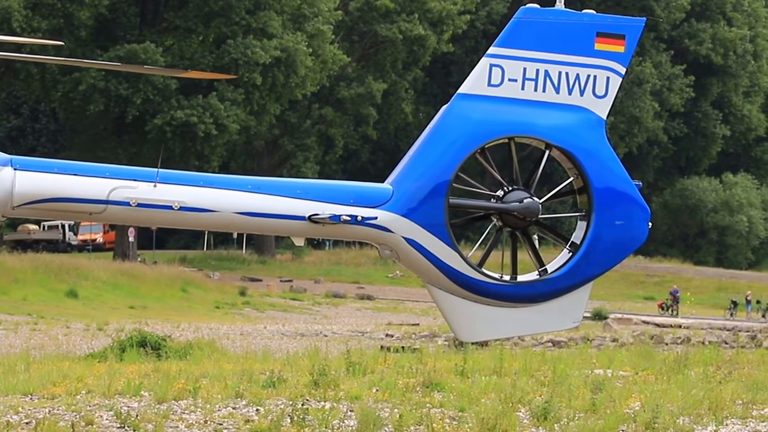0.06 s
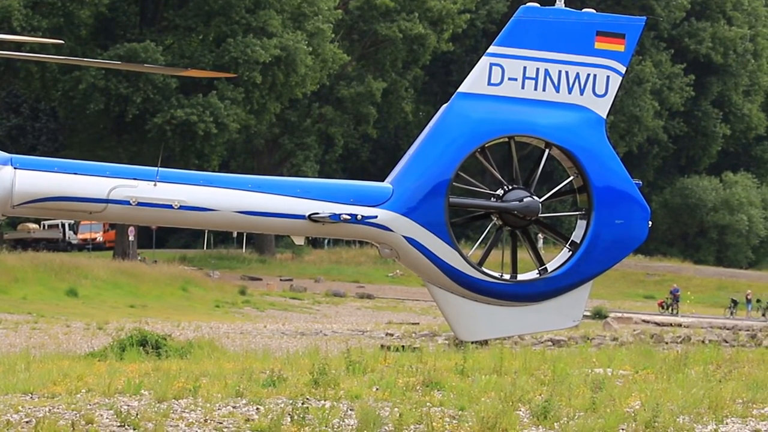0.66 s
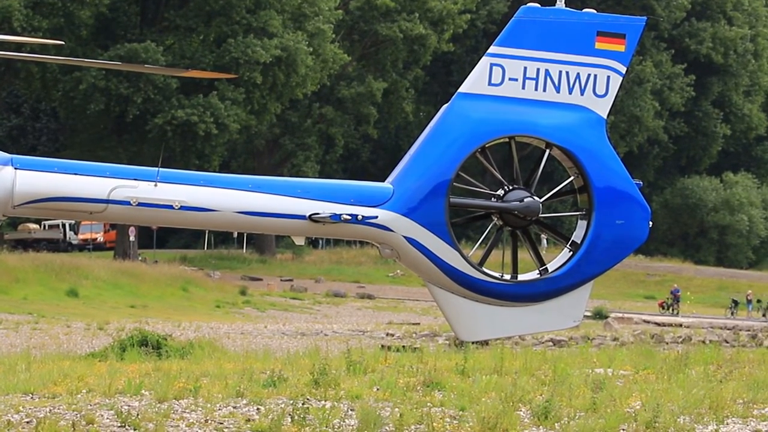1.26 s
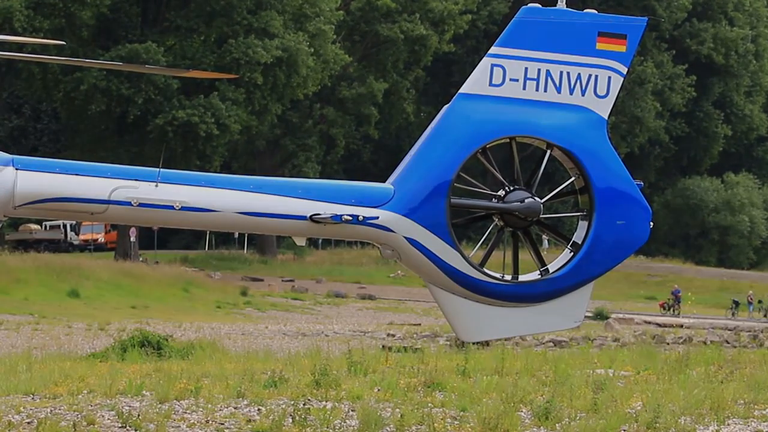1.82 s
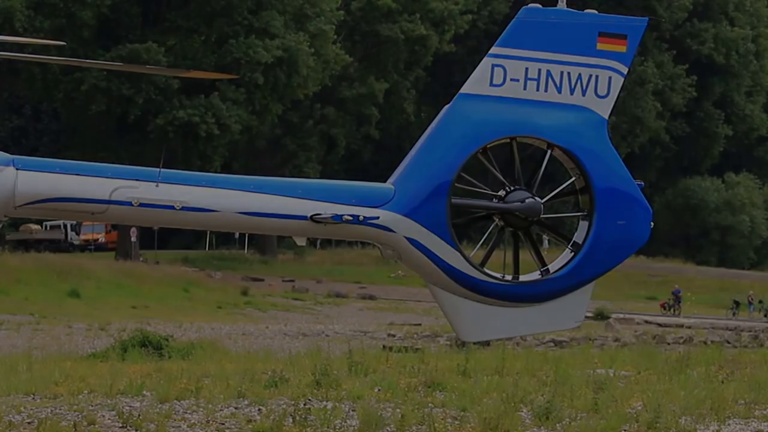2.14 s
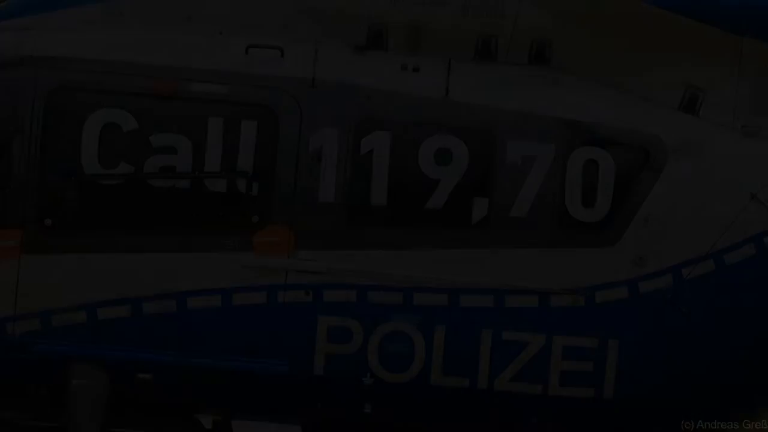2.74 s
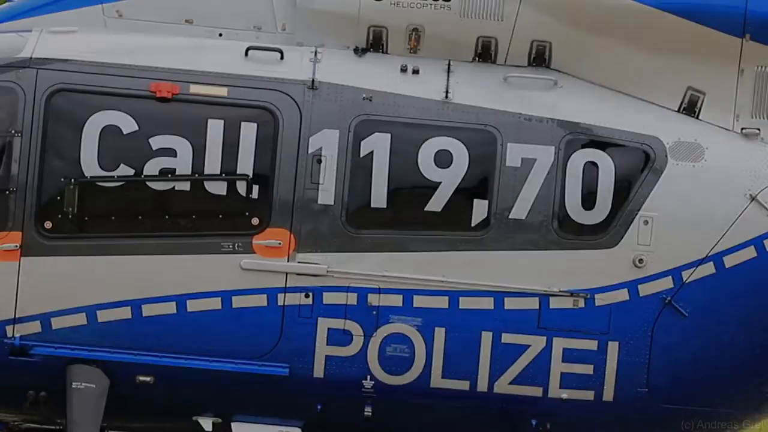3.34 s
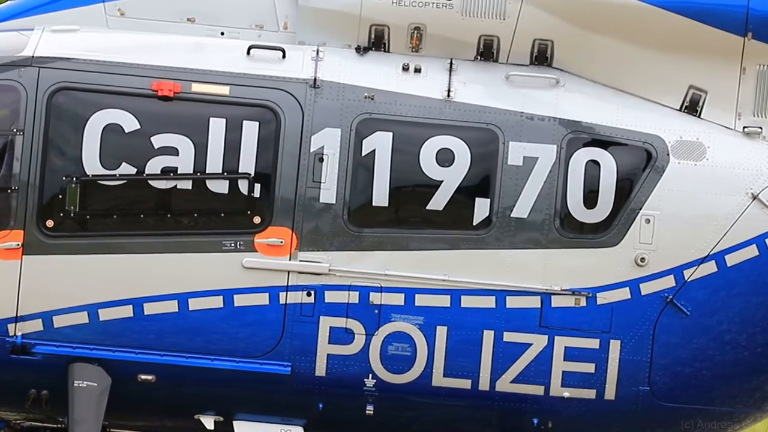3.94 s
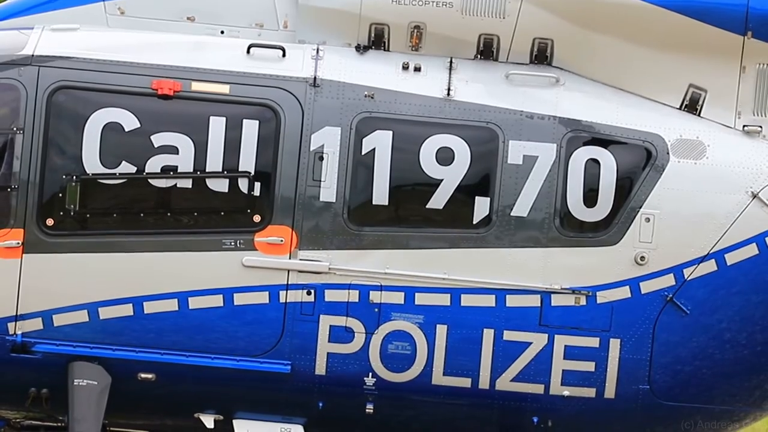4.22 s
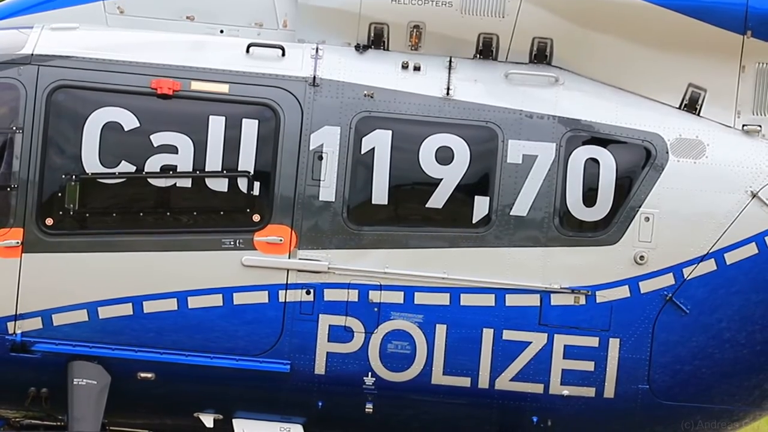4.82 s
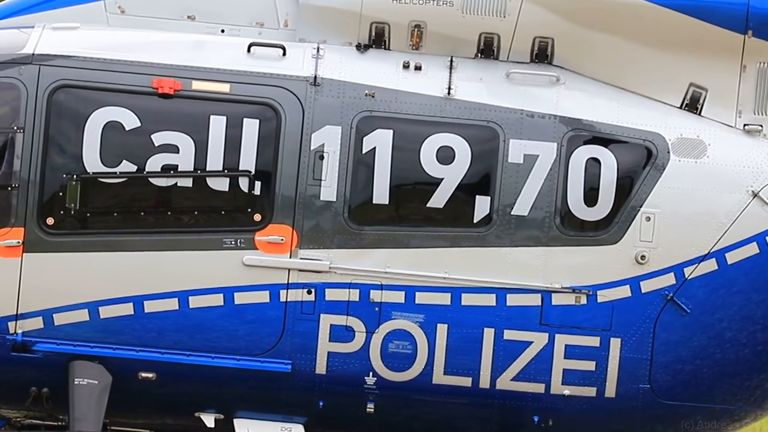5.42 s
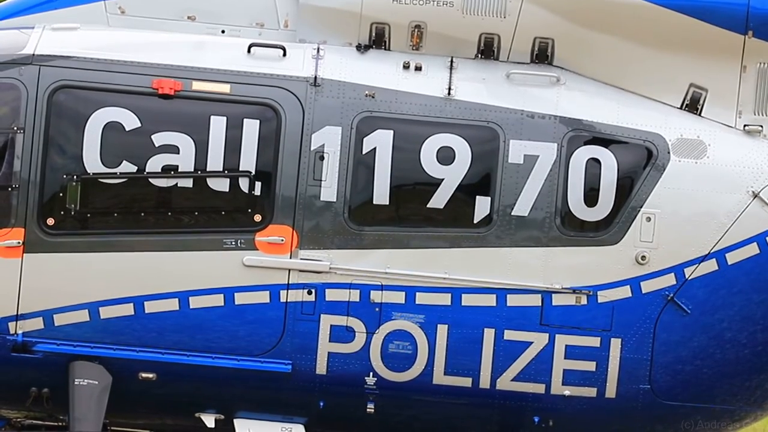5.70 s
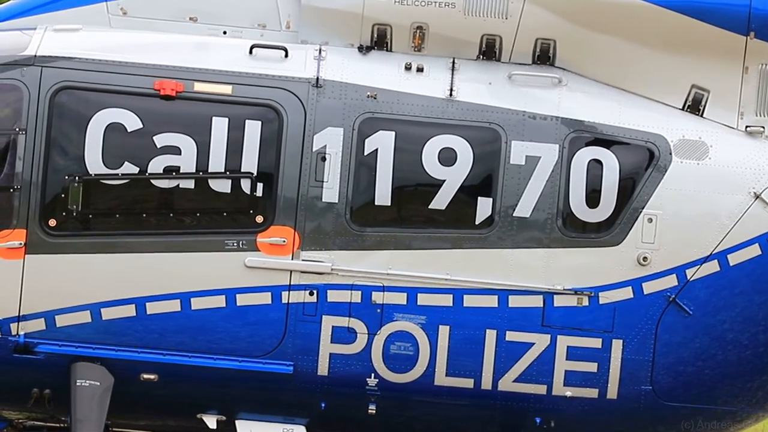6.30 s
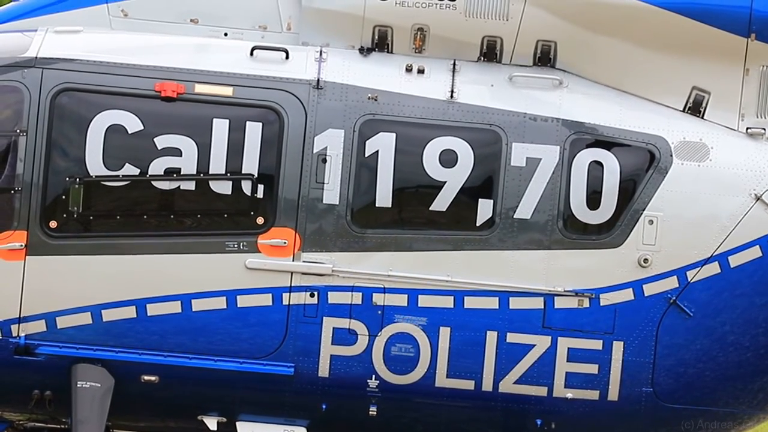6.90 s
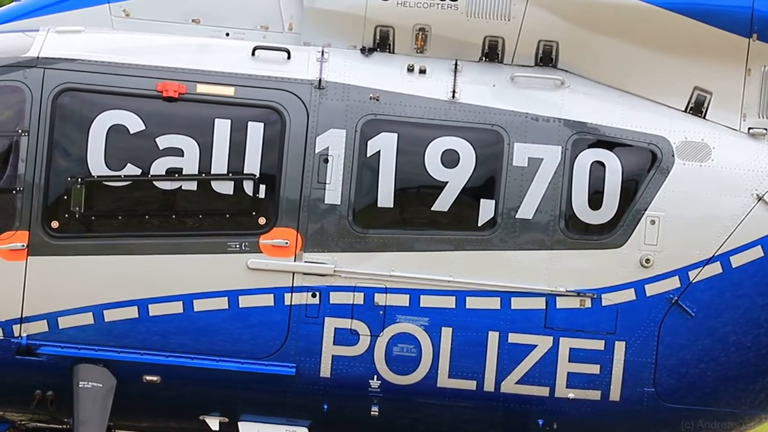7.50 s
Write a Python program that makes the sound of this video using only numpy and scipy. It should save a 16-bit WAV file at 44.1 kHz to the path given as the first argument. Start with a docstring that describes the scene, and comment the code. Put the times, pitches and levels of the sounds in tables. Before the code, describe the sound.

Several diesel machines drone and rattle in the open, their pitch sagging and climbing, with a brief fade to silence.

```python
"""Out in the open, near a parked helicopter, three diesel machines are at work.
A near engine speeds up and sags under load, a farther one drones against it, and a third revs up
late. Their firings make the exhausts hum and the machinery throb and clatter. Dry bearings squeak
and loose metal clinks faintly. The sound fades out at one listening spot and comes back in from
a second, closer to the clatter."""
import sys
import numpy as np
from scipy.fft import rfft, irfft, next_fast_len
from scipy.io import wavfile
from scipy.ndimage import uniform_filter1d, map_coordinates

SR = 44100
rng = np.random.default_rng(int(sys.argv[2]) if len(sys.argv) > 2 else 0)


def pcm_store(signal):
    """Save signal as 16-bit PCM."""
    levels = np.round(np.clip(np.atleast_2d(signal), -1, 1) * 32767)
    wavfile.write(sys.argv[1], SR, levels.astype(np.int16).T)


N = 337806
TIME = np.arange(N) / SR
SILENT_AT_S = 2.673  # the silent moment between the two spots


def amp(db):
    """Turn decibels into a gain."""
    return 10 ** (np.asarray(db) / 20)

def unit(x):
    """Scale x to an average power of 1."""
    return x / np.sqrt(np.mean(x ** 2) + 1e-20)

def curve(rows):
    """Join (seconds, value) points into one value per sample."""
    return np.interp(TIME, *np.transpose(rows))

def wobble(rate):
    """A smooth random curve through rate points a second."""
    return map_coordinates(rng.standard_normal(int(N * rate / SR) + 4), [TIME * rate])

def filtered(x, response):
    """Scale each frequency in x by response(hz)."""
    size = next_fast_len(N + SR // 2)
    return irfft(rfft(x, size) * response(np.fft.rfftfreq(size, 1 / SR)), size)[:N]

def rush(spectrum, pulse=1):
    """Noise of power 1, pulsed and then shaped by (Hz, relative dB) points."""
    freqs, db = np.transpose(spectrum)
    colour = lambda hz: amp(np.interp(np.log(hz + 1), np.log(freqs), db, left=-120, right=-120))
    return unit(filtered(pulse * rng.standard_normal(N), colour))

def blurred_tone(centre_hz, width_hz):
    """Noise of power 1, so narrow that it has a pitch."""
    return unit(filtered(rng.standard_normal(N), lambda hz: 1 / (1 + ((hz - centre_hz) / width_hz) ** 2)))

def turns(hz):
    """Count the cycles completed at a changing rate."""
    return np.cumsum(hz) / SR

def bursts(cycle, sharpness, scatter_db):
    """One swell per cycle, each of its own size."""
    size = amp(scatter_db * rng.standard_normal(4096))[np.floor(cycle).astype(int) % 4096]
    return unit(size * np.exp(-sharpness * (1 + np.cos(2 * np.pi * cycle))))

def by_spot(first, second):
    """One value before the silence, another after it."""
    return np.where(TIME < SILENT_AT_S, first, second)

def run_up(length_s=1.0):
    """How far the third engine has come in, from 0 to 1."""
    return np.clip((TIME - REVVING_SPEED[0][0]) / length_s, 0, 1)

def pull(hz, smooth_s=0.16):
    """How fast an engine speeds up, in Hz per second."""
    return uniform_filter1d(np.maximum(np.gradient(hz) * SR, 0), int(smooth_s * SR))

# Surges of work. Each row: start in seconds, hold in seconds, boost in dB that each noise scales.
WORK_SURGES = [(3.204, 0.24, 3.5), (4.201, 0.18, 5.5), (7.17, 0.16, 5.5), (7.454, 0.13, 3.5)]
def surges(rise_s=.05, fall_s=.089):
    """Extra dB as hard work makes the machinery growl and rattle."""
    return sum(db * np.interp(TIME - start, np.cumsum([0, rise_s, hold, fall_s]), [0, 1, 1, 0])
               for start, hold, db in WORK_SURGES)

def effort(speed_db, pull_db, surge_share, cruise_hz=66.6):
    """Extra dB from work: speed_db per Hz over cruise, pull_db per Hz/s of pull, plus surges."""
    far_hz, near_hz = curve(FAR_SPEED), curve(NEAR_SPEED)
    far_db = speed_db * (far_hz - cruise_hz)
    near_db = speed_db * (near_hz - cruise_hz) + pull_db * pull(near_hz)
    return by_spot(far_db, near_db) + surge_share * surges()


# Thin, steady whistles. Each row: pitch in Hz, level in dB.
WHISTLE_TONES = [(6000, -88), (8000, -91), (10000, -91), (15632, -83)]
def electronics():
    """Electronics add a faint hiss and thin tones."""
    hiss = amp(-67) * rush([(1000, 2), (5000, 2), (7000, 0.17), (15000, -1.6), (17000, -2)])
    return hiss + np.sqrt(2) * sum(amp(db) * np.sin(2 * np.pi * hz * TIME) for hz, db in WHISTLE_TONES)

def sizzle(firings):
    """A thin, bright rattle shakes with the firings and wakes in the surges."""
    shake = bursts(firings, sharpness=0.71, scatter_db=3.5)
    return amp(-82 + 2 * surges()) * rush([(3700, -20), (4100, 0), (4500, -2.5), (5200, -19.5)], shake)

def howl():
    """At the second spot the intake rings out in the surges."""
    return amp(-67 + 3 * surges()) * blurred_tone(centre_hz=780, width_hz=34) * by_spot(0, 1)

# The far engine's gear whine. Each row: pitch in Hz, level in dB.
GEAR_TONES = [(392, -56), (664, -55.3), (753, -52), (1044, -58.5), (1254, -58), (1410, -59)]
def gears():
    """Unevenly meshing teeth make blurred tones, heard only at the first spot."""
    return sum(amp(db) * blurred_tone(hz, width_hz=14) for hz, db in GEAR_TONES) * by_spot(1, 0)

# Squeaks. Each row: start in seconds, length in seconds, first and last pitch in Hz, level in dB.
BEARING_SQUEAKS = [(.19, .12, 2050, 2290, -48), (.30, .14, 1760, 1720, -54), (.37, .11, 1930, 2000, -55),
                   (.58, .16, 2420, 2400, -52), (1.81, .18, 2030, 2410, -50), (5.73, .035, 3880, 3950, -61),
                   (7.04, .26, 1700, 1780, -55), (7.51, .13, 2020, 1980, -50)]
def squeaks():
    """Dry bearings squeak, each sliding quickly to its pitch and settling."""
    out = np.zeros(N)
    for start, length, first_hz, last_hz, db in BEARING_SQUEAKS:
        progress = np.clip((TIME - start) / length, 0, 1)
        hz = last_hz + (first_hz - last_hz) * (1 - progress) ** 2 + 12 * wobble(90)
        swell = np.sqrt(abs(np.sin(np.pi * progress)))
        out += amp(db) * swell * np.sin(2 * np.pi * turns(hz))
    return out

# Clinks. Each row: start in seconds, pitch in Hz, width in Hz, fade time in seconds, level in dB.
METAL_CLINKS = [(1.482, 4700, 900, .004, -57), (1.497, 4700, 900, .004, -58),
                (1.68, 5200, 900, 0.0051, -65), (3.404, 1794, 900, 0.0061, -41),
                (4.363, 2103, 250, 0.026, -51), (5.54, 2930, 450, .014, -44.5),
                (5.559, 3270, 500, .035, -51), (5.63, 2650, 420, 0.013, -45.5),
                (5.649, 7400, 700, 0.0027, -55), (5.862, 2700, 400, 0.014, -48.5),
                (6.009, 4000, 250, 0.042, -61), (6.06, 2570, 500, .015, -50),
                (6.262, 2990, 500, 0.055, -55), (6.384, 3700, 400, .009, -50),
                (7.116, 3480, 300, .02, -47.5), (7.19, 780, 90, 0.011, -37), (7.51, 8500, 4500, .0015, -45),
                (7.626, 3384, 250, 0.0075, -48)]
def clinks(attack_s=0.00011, chatter_hz=195):
    """Loose metal chatters rapidly, and its dull ring dies at once."""
    out, t = np.zeros(N + SR), np.arange(SR // 7) / SR
    hz = np.fft.rfftfreq(len(t), 1 / SR)
    for start, centre_hz, width_hz, fade_s, db in METAL_CLINKS:
        contact = rng.standard_normal(len(t)) * bursts(chatter_hz * t + .5, sharpness=0.96, scatter_db=0)
        ring = unit(irfft(rfft(contact) * np.exp(-.5 * ((hz - centre_hz) / width_hz) ** 2), len(t)))
        envelope = (1 - np.exp(-t / attack_s)) * np.exp(-(t / fade_s) ** 2)
        out[round(start * SR):][:len(t)] += amp(db) * ring * envelope
    return out[:N]

# The injectors' bright noise. Each row: frequency in Hz, relative level in dB.
CLATTER_SPECTRUM = [(2600, -22), (2950, -9), (3170, -1), (3430, 0), (3600, -5), (3800, -15), (4200, -19),
                    (5200, -38)]
def clatter(firings, air_db):
    """The injectors knock at each firing: the louder, the sharper."""
    db = by_spot(-62.5, -61) + effort(speed_db=.22, pull_db=.297, surge_share=.25)
    hardness = np.interp(db + 1.5 * wobble(6), [-62, -56], [.3, .8])
    knock = bursts(firings, sharpness=hardness, scatter_db=2) / amp(-5.5 * (hardness - .5))  # even power
    return amp(db + air_db + 1.1 * wobble(12)) * rush(CLATTER_SPECTRUM, knock)

# The cover's high rasp. Each row: frequency in Hz, relative level in dB.
COVER_SPECTRUM = [(1700, -23.5), (2050, -4.5), (2350, -2.5), (2550, -5.5), (2850, -12.5), (3400, -22.5)]
def cover(gulp, air_db):
    """The engine cover rasps in time with the intake."""
    db = by_spot(-54.5, -58) + effort(speed_db=.18, pull_db=.2629, surge_share=.45)
    return amp(db + air_db + .78 * wobble(16)) * rush(COVER_SPECTRUM, gulp)

# The intake's hollow noise. Each row: frequency in Hz, relative level in dB.
INTAKE_SPECTRUM = [(520, -25), (660, -10), (745, -6), (790, 0), (835, -3), (920, -8), (1100, -17),
                   (1500, -35)]
def intake(gulp):
    """The intake gulps air, louder in the surges."""
    db = by_spot(-52.5, -51.5) + effort(speed_db=.02, pull_db=.17, surge_share=.8)
    return amp(db + .51 * wobble(14)) * rush(INTAKE_SPECTRUM, gulp)

# The fan's broad rush. Each row: frequency in Hz, relative level in dB.
FAN_SPECTRUM = [(500, -7), (950, 0.5), (1250, 1), (1410, -0.5), (1580, 1), (2000, -3), (2250, -12),
                (2850, -12), (3400, -18.5), (4000, -21.5), (4600, -30.5), (6000, -40)]
def fan(throb, air_db):
    """The fan rushes louder as the engine runs faster."""
    db = by_spot(-45, -48.5) + effort(speed_db=.16, pull_db=0, surge_share=.05)
    return amp(db + air_db) * rush(FAN_SPECTRUM, throb)

# The casing's low growl. Each row: frequency in Hz, relative level in dB.
CASING_SPECTRUM = [(170, -20), (245, -8), (290, 0.5), (350, 0), (410, -4.5), (490, -8), (620, -4.5),
                   (900, -15.5), (1600, -35.5)]
def casing(throb):
    """The engine casing throbs with the firings."""
    db = by_spot(-45, -45.5) + effort(speed_db=-.01, pull_db=.07, surge_share=.15)
    return amp(db) * rush(CASING_SPECTRUM, throb)

# The rumble at each spot. Each row: frequency in Hz, relative level in dB.
FIRST_SPOT_RUMBLE = [(12, -28.5), (30, -25.5), (45, -34), (65, -4.5), (82, -2.5), (105, -4.5), (135, 3.5),
                     (160, -5), (200, -11.5), (240, -17.5), (400, -49)]
SECOND_SPOT_RUMBLE = [(12, -29.5), (28, -18), (45, -7.5), (80, -3.5), (110, 0), (138, -2), (160, -10.5),
                      (195, -15.5), (240, -21), (400, -50.5)]
def rumble():
    """The engines' deep rumble grows as the third one comes in."""
    db = by_spot(-33, -32) + 2.4 * run_up()
    return amp(db) * by_spot(rush(FIRST_SPOT_RUMBLE), rush(SECOND_SPOT_RUMBLE))

def machinery(firings):
    """Engine parts pulse with the near engine; at the first spot they chug with the far one."""
    chug = bursts(turns(curve(FAR_SPEED) / 6), sharpness=.14, scatter_db=.3)  # once in six firings
    throb = by_spot(chug * bursts(firings, sharpness=.13, scatter_db=.38),
                    bursts(firings, sharpness=.12, scatter_db=1.1))
    gulp = by_spot(chug, bursts(firings, sharpness=.33, scatter_db=2.1))
    air_db = .64 * wobble(9.8)  # moving air makes the high noises swell together
    high_noises = clatter(firings, air_db) + cover(gulp, air_db) + fan(throb, air_db)
    return high_noises + intake(gulp) + casing(throb)

# What a silencer lets out. Each row: frequency in Hz, boost or cut in dB.
SILENCER_GAIN = [(35, -15), (46, -7.5), (56, -8.5), (63, -10), (72, -5.3), (88, -12.5), (110, 2.5),
                 (122, 2), (136, -.3), (144, -6.5), (160, -13)]
def exhaust(speed, firing_db, octave_db, pull_db, third_db, crank_db, upper_db, waver_db):
    """The firing tone and its octave slide through the silencer's resonances."""
    hz = curve(speed)
    phase = 2 * np.pi * turns(hz)
    silencer = np.transpose(SILENCER_GAIN)
    low_db = firing_db + np.interp(hz, *silencer)
    high_db = octave_db + np.interp(2 * hz, *silencer) + pull_db * pull(hz)  # barks when speeding up
    # Each pair: multiple of the firing rate, level in dB. Unequal cylinders add the weak tones.
    strong = [(1, low_db), (2, high_db)]
    weak = [(3, high_db + third_db), (2 / 3, low_db + crank_db),
            (5 / 3, high_db + upper_db), (5 / 2, low_db + upper_db)]
    hum = sum(amp(db + waver_db * wobble(9.7)) * np.sin(k * phase) for k, db in strong)
    unsteady = sum(amp(db + 4.1 * wobble(5.4)) * np.sin(k * phase + wobble(1.8)) for k, db in weak)
    return np.sqrt(2) * (hum + unsteady)

# The far engine's speed. Each row: time in seconds, firings per second.
FAR_SPEED = [(0.0, 61.85), (1.4, 62.4), (2.0, 62.87), (3.1, 59.04), (4.7, 58.46), (6.3, 61.5), (7.0, 64.75),
             (7.66, 73.82)]
def far_engine():
    """The far exhaust beats against the others, slowly where their speeds cross."""
    return exhaust(FAR_SPEED, firing_db=by_spot(-36, -39), octave_db=by_spot(-29.8, -39.5),
                   pull_db=.69, third_db=-22.5, crank_db=-13.5, upper_db=-15.5, waver_db=.6)

# The third engine's speed. Each row: time in seconds, firings per second.
REVVING_SPEED = [(4.5, 32.94), (5.25, 47.07), (5.75, 58.12), (6.0, 58.2), (6.3, 61.73), (7.0, 71.35),
                 (7.66, 79.45)]
def revving_engine():
    """The third exhaust swells in late and climbs in pitch."""
    return run_up() * exhaust(REVVING_SPEED, firing_db=-25, octave_db=-29,
                              pull_db=.05, third_db=-32, crank_db=-12, upper_db=-14, waver_db=2)

# The near engine's speed. Each row: time in seconds, firings per second.
NEAR_SPEED = [(0.0, 70.1), (0.65, 69.7), (1.0, 69.58), (1.4, 64.36), (1.8, 63.95), (2.45, 63.7),
              (2.75, 61.55), (3.55, 72.84), (4.05, 72.6), (4.75, 67.38), (5.25, 61.7), (5.5, 60.39),
              (5.8, 53.15), (6.0, 56.55), (6.5, 55.3), (7.0, 59.62), (7.66, 67.1)]
def near_engine():
    """The near exhaust's hum sags and climbs under load."""
    return exhaust(NEAR_SPEED, firing_db=by_spot(-29.8, -26.8), octave_db=by_spot(-30.7, -26.5),
                   pull_db=.22, third_db=-32.5, crank_db=by_spot(-9.5, -14.5), upper_db=-19, waver_db=1)

def scene():
    """All the machines together, in one channel."""
    firings = turns(curve(NEAR_SPEED))
    engines = near_engine() + far_engine() + revving_engine() + rumble() + machinery(firings)
    return (engines + howl() + sizzle(firings) + gears() + squeaks() + clinks())[None]

def record(dry, fade_s=1.0, top_hz=15760):
    """Add the electronics, fade to silence and back, and cut the highest treble."""
    fade = np.clip(abs(TIME - SILENT_AT_S) / fade_s, 0, 1)
    return filtered((dry[0] + electronics()) * fade, lambda hz: hz < top_hz)[None]


dry = scene()
out = record(dry)
pcm_store(out)
```